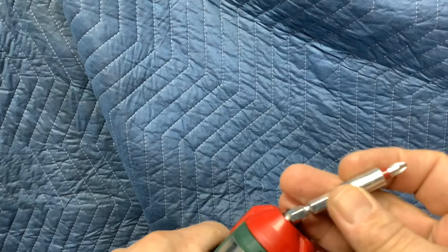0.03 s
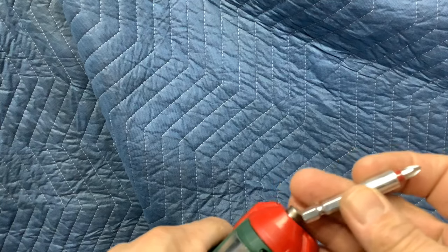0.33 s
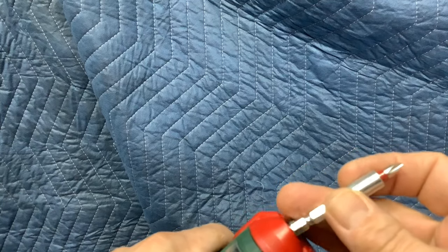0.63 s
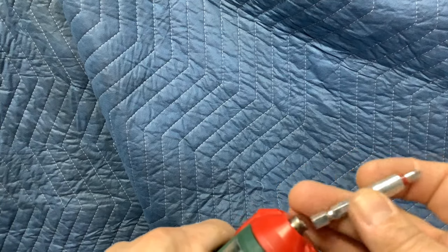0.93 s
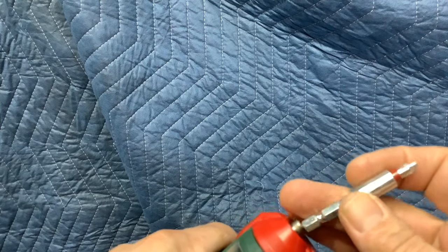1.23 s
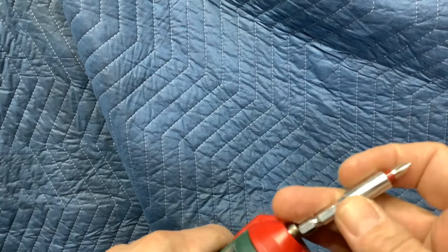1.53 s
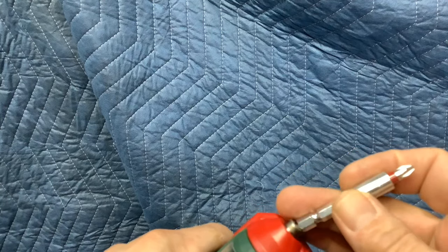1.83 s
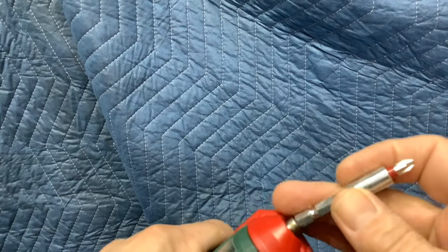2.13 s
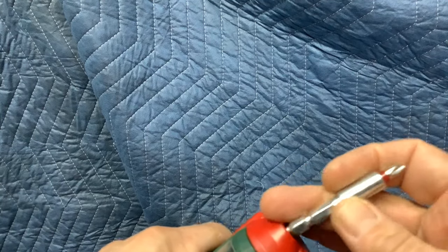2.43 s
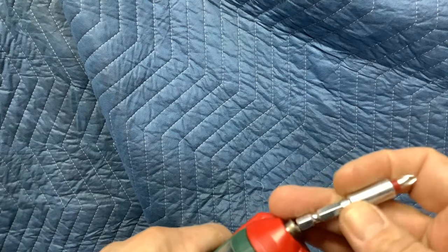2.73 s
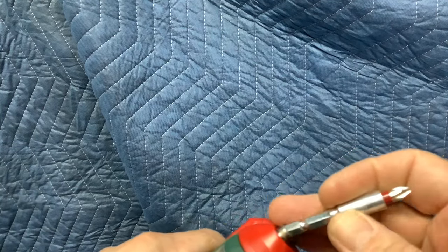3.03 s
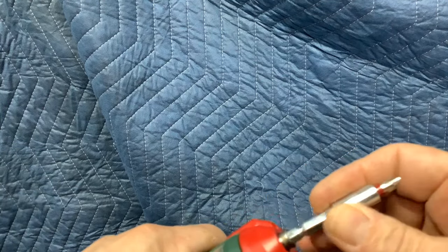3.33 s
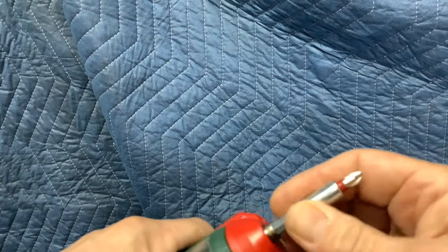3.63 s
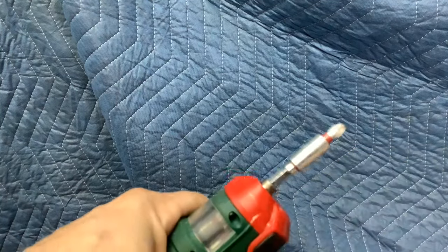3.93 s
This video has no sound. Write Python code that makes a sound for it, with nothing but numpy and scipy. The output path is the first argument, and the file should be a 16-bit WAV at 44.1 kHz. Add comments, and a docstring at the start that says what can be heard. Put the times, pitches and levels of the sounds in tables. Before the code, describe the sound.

Irregular metal clicks and one sharp snap as a bit holder seats in a cordless screwdriver.

```python
"""A steel bit holder is rocked and tugged in the socket of a small cordless screwdriver, heard close up.
Its shank clicks against the socket walls, scrapes between clicks, and once snaps home hard enough to clip.
Each contact rings the holder and housing, and harder blows add a dull thump. Fingers rub on the plastic.
A small quiet room answers, over a low steady rumble and faint hiss."""
import sys
import numpy as np
from scipy import signal
from scipy.fft import rfft, irfft
from scipy.io import wavfile

SR = 44100
rng = np.random.default_rng(int(sys.argv[2]) if len(sys.argv) > 2 else 0)


def int16_out(signal):
    """Quantize to a 16-bit WAV file."""
    q = np.round(np.clip(np.atleast_2d(signal).T, -1, 1) * 32767)
    wavfile.write(sys.argv[1], SR, q.astype(np.int16))


N = 176400

# Tone of the rumble and hiss. Each row: frequency in Hz, relative level in dB.
BED_TONE = [(15, -43), (25, -22), (58, -2.5), (127, -1), (326, -11), (936, -22), (1100, -36.5),
            (1190, -27.5), (1400, -28), (2050, -29.5), (2550, -28.5), (3250, -28.5), (4490, -27.5),
            (14800, -29.5), (16000, -25.5)]
# Decay of the room tail. Each row: frequency in Hz, t60 in seconds.
ROOM_DECAY = [(150, 0.25), (700, 0.19), (2000, 0.24), (5000, 0.25), (9000, 0.21), (16000, 0.087)]
# Tone of the room tail. Each row: frequency in Hz, gain in dB.
ROOM_TONE = [(100, -26), (700, -16.5), (2000, -19.5), (4500, -22), (8000, -17), (15000, -22)]
# Near reflections. Each row: delay in seconds, gain in dB.
REFLECTIONS = [(.0034, -19), (.0068, -20), (.0125, -27), (.0255, -27)]
# Fingers rubbing the housing. Each row: start in seconds, length in seconds, level in dB.
FINGER_RUBS = [(0.447, 0.064, -76), (1.06, 0.13, -69), (1.213, 0.19, -73.5), (2.117, 0.26, -73.5),
               (3.18, .06, -55), (3.59, 0.19, -67.5), (3.665, .045, -63)]
# Tone of skin on plastic. Each row: frequency in Hz, relative level in dB.
RUB_TONE = [(100, 5), (300, 8.5), (800, -10), (2100, 1), (3200, -12.5), (4500, -12), (7000, -15.5),
            (9000, -12), (16000, -14)]
# Jolts of the housing. Each row: start in seconds, relative level in dB, t60 in seconds.
HOUSING_THUMPS = [(.563, -58, 0.024), (1.872, -59, 0.029), (2.884, -61, 0.037), (3.177, -53, 0.056),
                  (3.207, -60, 0.083), (3.352, -38.5, 0.041), (3.365, -50, 0.14)]
# Modes of holder and housing. Each row: frequency in Hz, relative level in dB, t60 in seconds.
TOOL_MODES = [(780, -14.5, .010), (1168, 6.5, 0.009), (1440, -23, 0.091), (1635, 0, 0.0082),
              (2207, 5.5, 0.015), (2500, -5.5, 0.0088), (3798, 5.5, 0.0083), (4125, -9, 0.036),
              (5200, 2.5, .008), (6900, -4, 0.0081), (8316, 6, 0.01), (10230, -4.5, 0.014),
              (13630, -5, 0.0054)]
# Where the knock, body, steel ring and top tick bands begin, in Hz.
BAND_STARTS_HZ = (560, 1450, 3000, 6500)
# Short rasps: at 3.334 s a brief bright hiss swelling just before the snap, elsewhere the shank scraping.
# Each row: start in seconds, length in seconds, body level in dB before the trim,
# then knock, steel ring and top tick in dB relative to the body.
RASPS = [(.153, 0.013, -38, -19.5, -7, -8), (0.363, 0.0082, -65, -20, -19, -20),
         (0.5, 0.034, -49, -22, -18, -14.5), (0.517, 0.0093, -48, -22, -15, -20),
         (.791, 0.0058, -53, -17, -9, -25), (0.801, 0.031, -50.5, -22, -11, -16),
         (0.829, .005, -39.5, -20, -5, -8.5), (1.074, 0.0089, -56, -15, -19, -25),
         (1.087, 0.088, -59, -15.5, -22, -24), (1.134, 0.009, -54.5, -16, -29, -15),
         (1.318, .012, -63.5, -3, -19, -8), (1.378, 0.023, -68.5, -7, -15, -11),
         (1.866, 0.0077, -46, -2.5, -6.5, -12), (2.152, 0.019, -53, -9, -13, -22),
         (2.223, 0.033, -62, -5, -15, -22), (2.41, 0.062, -58, -16, -8, -12),
         (2.446, .009, -38, -23, -3.5, -12.5), (2.869, 0.013, -52.5, -10, -12, -18),
         (2.8836, 0.0016, -34, -20, 0.5, -11), (3.097, .007, -59, -19, -17, -19),
         (3.138, 0.039, -60, -9, -13, -12), (3.307, 0.074, -52.5, -7, -5, -9),
         (3.334, 0.017, -37, -11, 1, -1), (3.365, 0.049, -35.5, -22, -9, -21),
         (3.66, 0.0042, -67, -4, 1.5, -5), (3.731, .018, -54, -12.5, -27.5, -15.5),
         (3.749, .026, -66, -10, -13.5, -12), (3.864, 0.0088, -59, -17, -10, -12.5)]
# Clicks on the socket walls. Each row: start in seconds, body level in dB before the trim,
# then knock, steel ring and top tick in dB relative to the body.
SHANK_CLICKS = [(0.3064, -42.5, -18.5, -2.5, -8), (0.5624, -37, 1, -16, -15.5),
                (0.675, -37.5, -8.5, 3, 6.5), (0.9472, -34.5, -10, 2, 0.5), (1.571, -54, -18, -26, -16.5),
                (1.8259, -64, -3.5, -3, -20.5), (1.8722, -34.5, -6, -3.5, -19),
                (2.0947, -41, -10.5, -3, -31), (2.1969, -59, -1, -20, -21),
                (2.2431, -46.5, -13, -12.5, -27), (2.2736, -47, 1, -21, -28),
                (2.3036, -53.5, -4.5, -12, -27), (2.3345, -53, -12.5, -2.5, -23),
                (2.5479, -31.5, -25, -5.5, -15.5), (2.7403, -56.5, -23, -17, -29),
                (2.8838, -35.5, -8, -11, -19), (3.1389, -56.5, -3, 2.5, -21), (3.1772, -32, -10, -1, -6.5)]
# The hard snap: catch, seating, and a quick echo just after. Each row reads like a click.
HARD_SNAP = [(3.3485, -31.5, -4, 0.13, 3.5), (3.3516, -11.5, -15.5, 0.93, 4), (3.3594, -33.5, -11.5, 0, -2)]

BED_DB = -67.5
DETUNE, STRIKE_SPREAD_DB = 0.011, 3  # each blow lands at another spot
CRACK_DB, CRACK_T60 = 15.5, 0.0059  # dense, quickly damped modes
GRAINS_PER_S, GRAIN_SPREAD_DB = 1500, 5.5
CHATTER, CHATTER_DECAY_S = 0.22, 0.0004
LEVEL_WINDOW_S = 0.0081  # a blow's level is its power over this time
CLICK_TRIM_DB, RASP_TRIM_DB = -2.5, -3
CEILING, TOP_HZ = 1.05, 16300


def amp(db):
    """Decibels to gain."""
    return 10 ** (np.asarray(db) / 20)


def unit_rms(x):
    """Scales to rms 1."""
    return x / np.sqrt(np.mean(x ** 2) + 1e-20)


def curve_at(points, hz):
    """Reads a table on a log-frequency axis."""
    point_hz, values = np.transpose(points)
    return np.interp(np.log(hz + 1), np.log(point_hz), values)


def add(mix, start, sound):
    """Mixes a sound in at a start time in seconds."""
    part = mix[round(start * SR):][:len(sound)]
    part += sound[:len(part)]


def equalise(x, tone):
    """Shapes x with an EQ curve of (Hz, dB) points."""
    return irfft(rfft(x) * amp(curve_at(tone, np.fft.rfftfreq(len(x), 1 / SR))), len(x))


def band(x, lo_hz, hi_hz, order=3):
    """Causal band-pass."""
    return signal.sosfilt(signal.butter(order, [lo_hz, hi_hz], "band", fs=SR, output="sos"), x)


def noise_bed():
    """A low steady rumble with faint hiss."""
    return amp(BED_DB) * unit_rms(equalise(rng.standard_normal(N), BED_TONE))


def room(x):
    """The small room returns a few near reflections and a short diffuse tail."""
    hz, t, spectrum = signal.stft(rng.standard_normal(SR // 2), SR, nperseg=256)
    fade = amp(-60 * t / curve_at(ROOM_DECAY, hz)[:, None])
    tail = signal.istft(spectrum * fade, SR, nperseg=256)[1]
    tail *= np.minimum(np.arange(len(tail)) / SR / 0.0059, 1)  # quick fade-in
    response = equalise(tail / np.linalg.norm(tail), ROOM_TONE)[:SR * 2 // 5]
    for delay, db in REFLECTIONS:
        add(response, delay, amp([db]))
    return signal.fftconvolve(x, response)[:N]


def finger_rubs():
    """Skin drags over plastic in soft grainy swells."""
    swell = np.zeros(N)
    for start, length, db in FINGER_RUBS:
        add(swell, start, amp(db) * np.sqrt(np.hanning(round(length * SR))))
    grains = rng.standard_normal(N) * amp(6.1 * rng.standard_normal(N))
    return swell * unit_rms(equalise(grains, RUB_TONE))


def housing_thumps():
    """Harder blows jolt the plastic housing, which the hand damps."""
    out, t = np.zeros(N), np.arange(SR // 4) / SR
    for start, db, t60 in HOUSING_THUMPS:
        fade = amp(-60 * t / t60)
        thud = band(fade * rng.standard_normal(len(t)), lo_hz=110, hi_hz=450, order=2)
        gain = 2 * amp(db) * np.sqrt(np.mean(fade ** 2))
        add(out, start, gain * unit_rms(thud))
    return out


def holder_ring(force, window_s, level_db, tone_db):
    """A contact force rings the holder; where it lands sets the share of knock, ring and tick."""
    t = np.arange(len(force)) / SR
    response = amp(CRACK_DB - 60 * t / CRACK_T60) * rng.standard_normal(len(t))
    for hz, db, t60 in TOOL_MODES:
        pitch, strength = rng.standard_normal(2)
        fade = amp(db + STRIKE_SPREAD_DB * strength - 60 * t / t60)
        response += fade * np.sin(2 * np.pi * hz * (1 + DETUNE * pitch) * t)
    ringing = signal.fftconvolve(force, response)[:len(t)]
    knock, steel, tick = tone_db
    gains = amp(level_db + np.array([knock, 0, steel, tick])) * [1, -1, 1, -1]  # alternate polarity
    edges = [*BAND_STARTS_HZ, TOP_HZ]
    bands = [gain * unit_rms(band(ringing, lo, hi)) for lo, hi, gain in zip(edges, edges[1:], gains)]
    return sum(bands) * np.sqrt(window_s * SR / len(t))


def rasps():
    """Short gritty swells: the shank's stick-slip scrapes, and also the bright hiss before the snap."""
    out, t = np.zeros(N), np.arange(SR // 4) / SR
    for start, length, level_db, *tone_db in RASPS:
        onsets = rng.random(len(t)) < GRAINS_PER_S / SR
        grains = onsets * amp(GRAIN_SPREAD_DB * rng.standard_normal(len(t)))
        swell = np.sqrt(abs(np.sin(np.pi * np.minimum(t / length, 1))))
        force = (grains + 0.061) * rng.standard_normal(len(t)) * swell  # grit over a light hiss
        window_s = max(length, LEVEL_WINDOW_S)
        add(out, start, holder_ring(force, window_s, level_db + RASP_TRIM_DB, tone_db))
    return out


def shank_clicks():
    """The shank strikes the socket or snaps home: a sharp attack and a brief chatter."""
    out, t = np.zeros(N), np.arange(SR // 6) / SR
    for start, level_db, *tone_db in [*SHANK_CLICKS, *HARD_SNAP]:
        chatter = CHATTER * np.exp(-t / CHATTER_DECAY_S) * rng.standard_normal(len(t))
        force = (t == 0) + chatter
        add(out, start, holder_ring(force, LEVEL_WINDOW_S, level_db + CLICK_TRIM_DB, tone_db))
    return out


def scene():
    """The handled tool up front, its room and the noise bed behind, in mono."""
    tool = shank_clicks() + rasps() + housing_thumps() + finger_rubs()
    return (noise_bed() + room(tool) + tool)[None]


def record(dry):
    """Hard-clips the snap, then cuts the very top of the treble."""
    lowpass = signal.firwin(255, TOP_HZ, window=("kaiser", 8), fs=SR)
    return signal.oaconvolve(np.clip(dry, -CEILING, CEILING), lowpass[None], "same")


dry = scene()
out = record(dry)
int16_out(out)
```